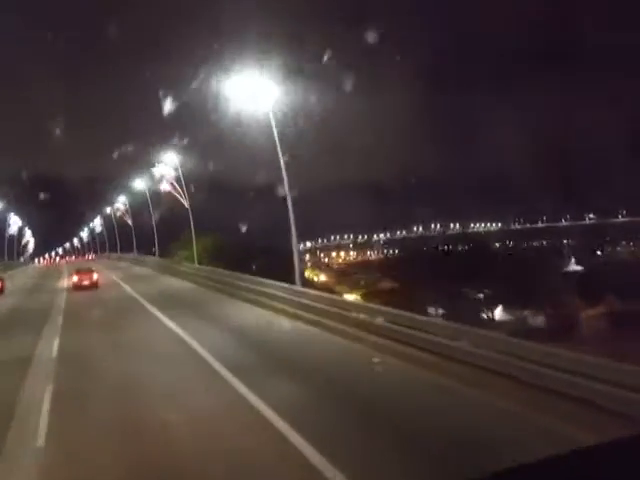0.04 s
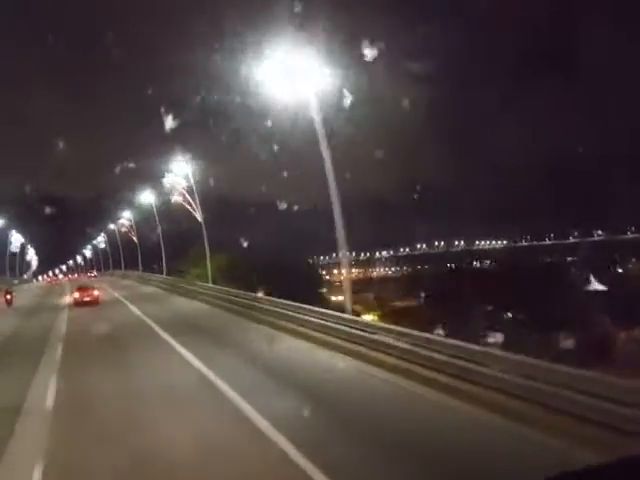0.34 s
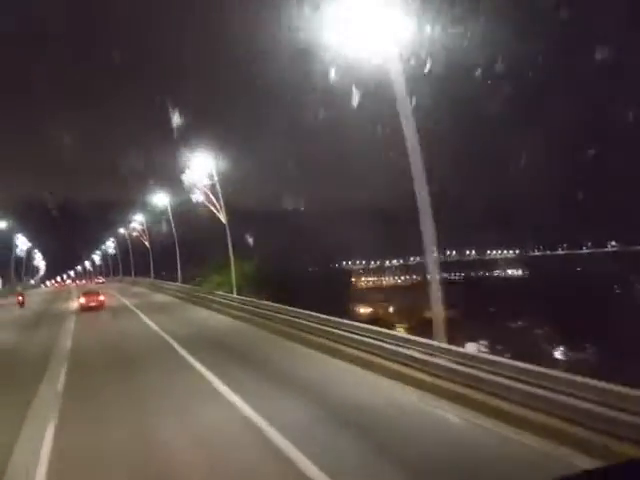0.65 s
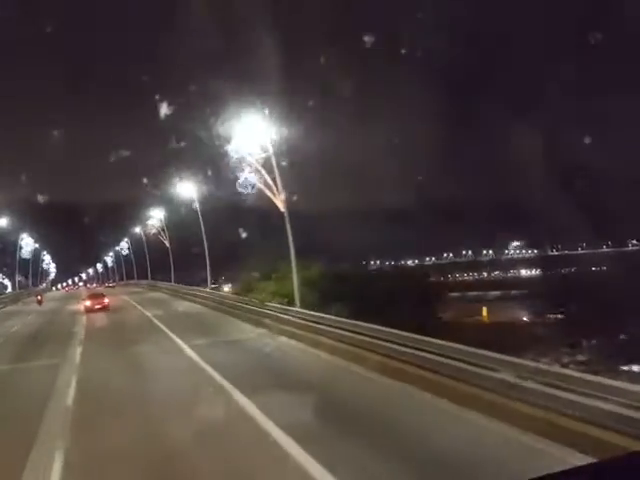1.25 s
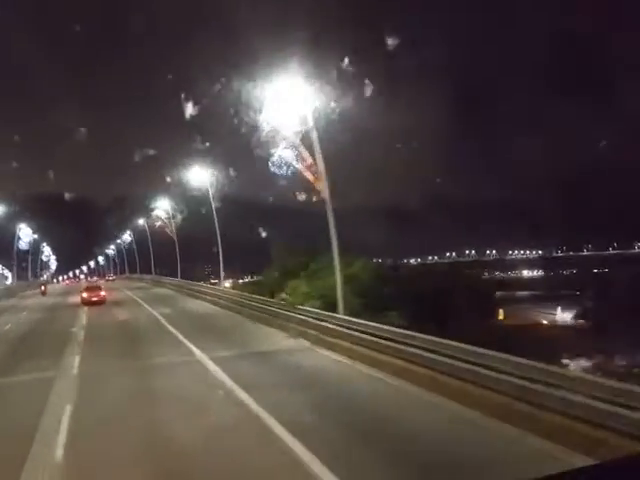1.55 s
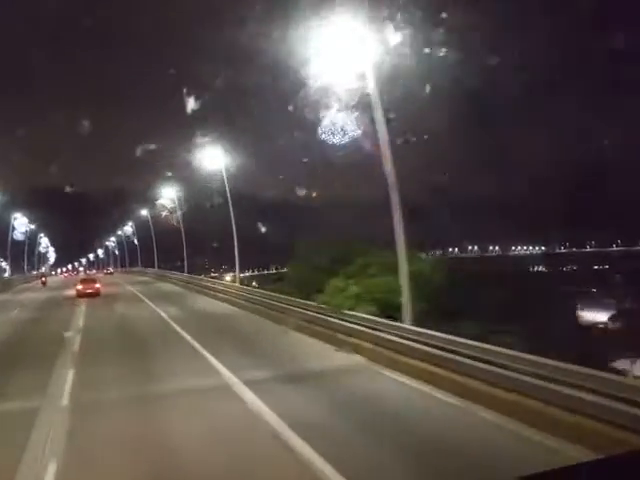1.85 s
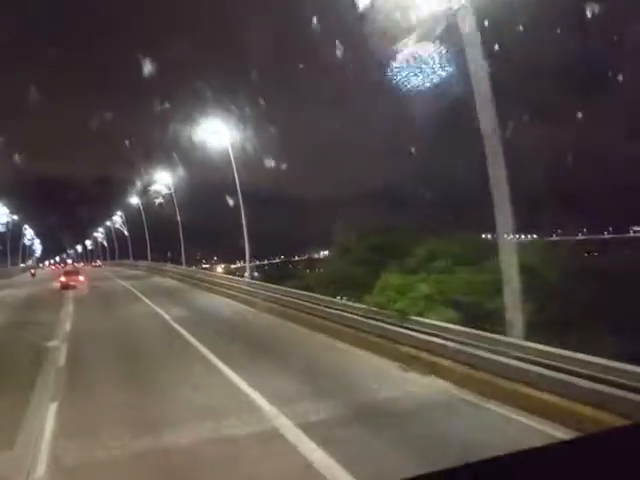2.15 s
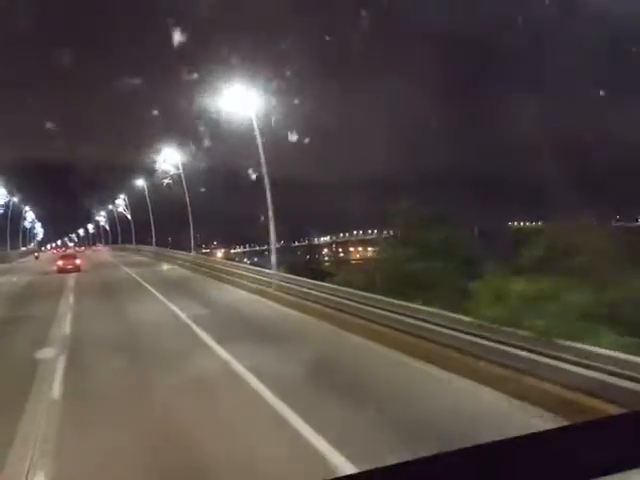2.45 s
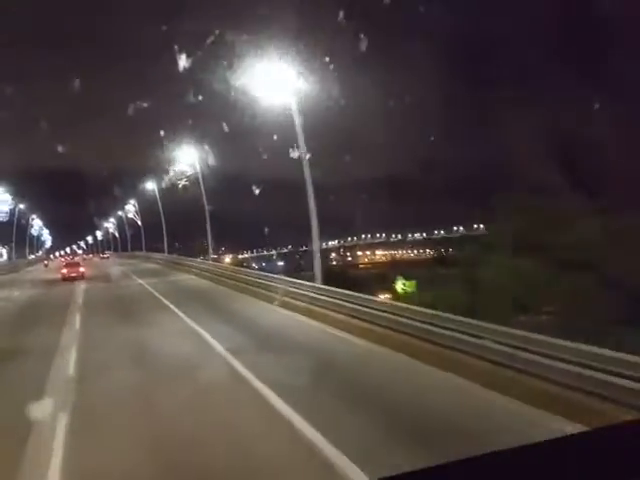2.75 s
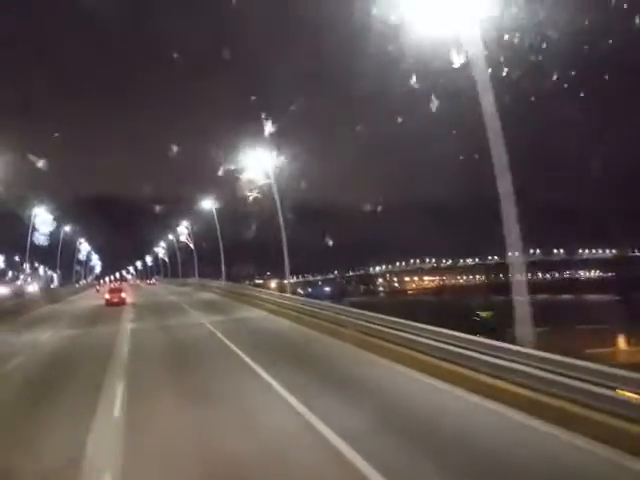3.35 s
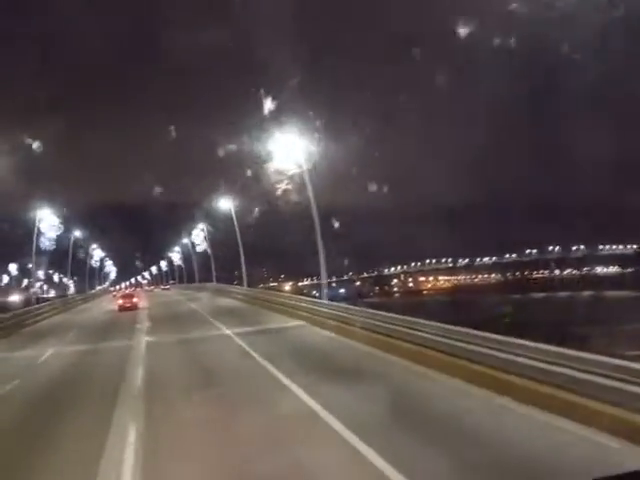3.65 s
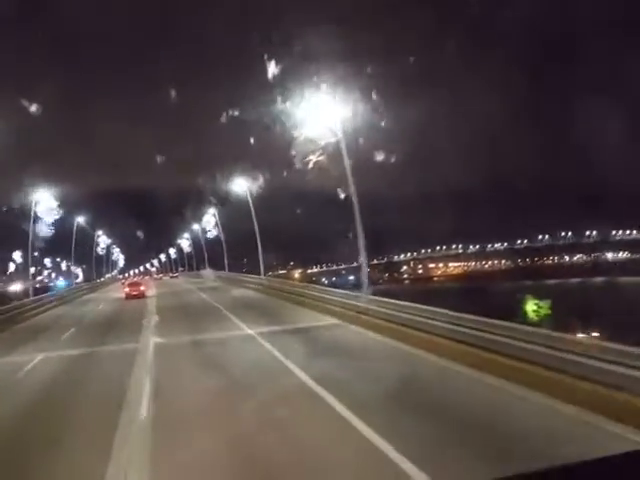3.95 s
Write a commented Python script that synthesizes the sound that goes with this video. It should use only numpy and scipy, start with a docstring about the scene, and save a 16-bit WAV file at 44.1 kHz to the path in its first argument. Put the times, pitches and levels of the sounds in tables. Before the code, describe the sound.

A bus's deep, throbbing road rumble runs for all four seconds, heard inside with tyre roar, soft wind and thin hiss. A nearby plastic panel rattles in quick bursts through the first second, with a hollow bump at 0.6 seconds. Sparser clicks and faint trim creaks follow until about 3 seconds. Then small metallic ticks and plastic rattles return, with another soft thud near 3.6 seconds.

```python
"""Inside a bus on a highway at night, from a stereo pair of microphones at the front seat.
The road shakes the body into a deep boom and throb under tyre roar, wind on the windscreen, a thin
hiss and a faint driveline whine. Bumps thud through the body. Nearby in the cabin the trim creaks,
a small metal fitting ticks and a loose plastic panel chatters in bursts of tiny contacts."""
import sys
import numpy as np
from scipy import signal
from scipy.fft import rfft, irfft
from scipy.io import wavfile
from scipy.ndimage import uniform_filter1d

SR = 44100
rng = np.random.default_rng(int(sys.argv[2]) if len(sys.argv) > 2 else 0)


def unload_wav(signal):
    """Save mono or channel-first audio to the path in sys.argv[1] as 16-bit WAV at rate SR, clipped to [-1, 1]."""
    wavfile.write(
        sys.argv[1],
        SR,
        np.round(np.clip(np.atleast_2d(signal).T, -1, 1) * 32767).astype(np.int16),
    )


N = 176400
TIME = np.arange(N) / SR
HZ = np.fft.rfftfreq(N, 1 / SR)


def amp(db):
    """Decibels to gain."""
    return 10 ** (np.asarray(db) / 20)


def unit(x):
    """Scales to rms 1."""
    return x / np.sqrt(np.mean(x ** 2) + 1e-20)


def by_pitch(points, hz):
    """Reads a table on a log-frequency axis."""
    f, value = np.transpose(points)
    return np.interp(np.log(hz + 1), np.log(f + 1), value)


def by_time(points):
    """Reads a control curve at every sample."""
    return np.interp(TIME, *np.transpose(points))


def add(mix, s, sound):
    """Mixes a stereo sound in at time s."""
    part = mix[:, max(round(s * SR), 0):][:, :sound.shape[1]]
    part += sound[:, :part.shape[1]]


def pan(db):
    """Microphone gains for a left minus right level."""
    return amp(np.array([[.5], [-.5]]) * db)


def flutter(rate_hz):
    """Random movement of rms 1, mostly slower than rate_hz."""
    return unit(irfft(rfft(rng.standard_normal(N)) * np.exp(-(HZ / rate_hz) ** 2), N))


def ring(t, hz, t60):
    """One dying mode, reaching each microphone in its own phase."""
    return np.sin(2 * np.pi * (hz * t + rng.random((2, 1)))) * np.exp(-np.log(1000) * t / t60)


def resonate(x, spectrum, tilt_db=0, uneven_db=3, uneven_hz=500, size=2048):
    """Rings x through a body of unit energy; each point of contact favours other resonances."""
    hz = abs(np.fft.fftfreq(size, 1 / SR))
    uneven = np.interp(hz / uneven_hz, np.arange(size), rng.standard_normal(size))
    tilt = tilt_db * np.log2(np.maximum(hz, 1000) / 1000)
    log_gain = np.log(amp(by_pitch(spectrum, hz) + tilt + uneven_db * uneven))
    minimum_phase = np.exp(np.conj(signal.hilbert(log_gain)))
    body = np.fft.ifft(minimum_phase).real[:size // 2]
    return signal.fftconvolve(x, body[None] / np.linalg.norm(body), axes=1)


# Likeness of the two microphones. Each row: frequency in Hz, correlation.
COHERENCE = [(60,.993),(290,.82),(640,.66),(1400,.08)]
# Balance of the pair. Each row: frequency in Hz, left minus right in dB.
BALANCE = [(130, 1), (280, -.3), (8000, -1.5)]

def noise(gain):
    """Noise of the given spectrum all around the microphones, near mono in the bass."""
    left, other = rfft(rng.standard_normal((2, N)))
    same = np.clip(by_pitch(COHERENCE, HZ), -1, 1)
    right = same * left + np.sqrt(1 - same ** 2) * other
    return unit(irfft(np.array([left, right]) * gain * pan(by_pitch(BALANCE, HZ)), N))


# The cabin's reverberation. Each row: frequency in Hz, t60 in seconds.
CABIN_DECAY = [(300, 0.16), (2000, 0.3), (15000, 0.076)]

def cabin(x, wet_db):
    """Adds the short, dense reflections of seats and windows."""
    hz, t, spectra = signal.stft(rng.standard_normal((2, SR // 3)), SR, nperseg=256)
    decay = amp(-60 * t / by_pitch(CABIN_DECAY, hz)[:, None])
    tail = signal.istft(spectra * decay, SR)[1]
    tail[:, :SR // 400] = 0  # the first reflection takes 2.5 ms
    return x + amp(wet_db) * signal.fftconvolve(x, tail / np.linalg.norm(tail[0]), axes=1)[:, :N]


# Gear tones, far in the background. Each row: pitch in Hz, level in dB, half-width in Hz.
GEAR_TONES = [(393.5, -51, 3), (763, -53.5, 10)]

def driveline():
    """The gears whine faintly in narrow, wavering bands."""
    return sum(amp(db) * noise(1 / (1 + ((HZ - hz) / width) ** 2)) for hz, db, width in GEAR_TONES)


# Hiss, wide across the pair. Each row: time in seconds, relative level in dB.
HISS_LEVEL = [(0,-46),(.4,-70),(.75,-49),(1.28,-56.5),(1.38,-66),(1.54,-52),(1.72,-51.5),(2.1,-67),(2.66,-59),(2.88,-54),(3.1,-55),(3.3,-71),(3.8,-59)]
# Its colour. Each row: frequency in Hz, gain in dB.
HISS_SPECTRUM = [(800, -8.5), (2500, 10.5), (4500, 1.5), (9300, 0.5), (11000, -7), (16000, -10)]

def hiss(gain_db=0.5):
    """A thin hiss that comes and goes."""
    level_db = gain_db + by_time(HISS_LEVEL) + 0.7 * flutter(rate_hz=60)
    return noise(amp(by_pitch(HISS_SPECTRUM, HZ))) * amp(level_db)


# Wind, heard from behind the glass. Each row: time in seconds, relative level in dB.
WIND_LEVEL = [(0,-47),(1.6,-52.5),(2,-51.5),(3.3,-53.5),(3.63,-47.5)]
# Its colour. Each row: frequency in Hz, gain in dB.
WIND_SPECTRUM = [(200, -15), (600, 5.5), (1600, 0), (3200, -9.5), (6000, -21.5), (16000, -46.5)]

def wind(gain_db=3.5):
    """Air rushes unevenly over the windscreen."""
    level_db = gain_db + by_time(WIND_LEVEL) + 1.9 * flutter(rate_hz=31)
    return noise(amp(by_pitch(WIND_SPECTRUM, HZ))) * amp(level_db)


# Roughness of the road. Each row: time in seconds, relative level of the roar in dB.
ROUGHNESS = [(0.03, -32.5), (0.52, -25.5), (0.7, -31), (1.4, -34), (3.21, -35), (3.56, -32)]
# The tyres, heard through the floor. Each row: frequency in Hz, gain in dB.
ROAR_SPECTRUM = [(60, -39), (150, 1), (220, 0.5), (272, -2), (295, -13), (370, -9.5), (540, -10),
                 (600, -16.5), (1100, -25), (2000, -55.5)]

def tyre_roar(gain_db=1.5):
    """The rolling tyres roar louder on rougher road."""
    level_db = gain_db + by_time(ROUGHNESS) + flutter(rate_hz=9.7)
    return noise(amp(by_pitch(ROAR_SPECTRUM, HZ))) * amp(level_db)


# Body shake, all around the seat. Each row: time in seconds, relative level in dB.
SHAKE_LEVEL = [(.03,-18.5),(.48,-15),(1.1,-19.5),(1.58,-25),(1.65,-16.5),(1.7,-22),(2.45,-18),(2.63,-19),(2.67,-34),(2.73,-18.5),(3.09,-24),(3.18,-14.5),(3.22,-25),(3.69,-19.5)]
# Resonances of the body and cabin air. Each row: frequency in Hz, gain in dB.
BOOM_SPECTRUM = [(12, -17.5), (32, -5), (42, -11.5), (52, -18), (62, -3), (82, -5.5), (100, -2), (114, -11),
                 (125, -6), (175, -36.5), (300, -88.5)]

def boom(gain_db=0.5, split_hz=80, upper_dip_db=0.75, smooth_s=0.2):
    """The road shakes the body's low resonances; the upper ones ease a little on rough road."""
    shape = amp(by_pitch(BOOM_SPECTRUM, HZ))
    upper_share = 1 / (1 + (split_hz / (HZ + 1)) ** 10)
    rough = by_time(ROUGHNESS)
    lower = noise(shape * np.sqrt(1 - upper_share))
    upper = noise(shape * np.sqrt(upper_share)) * amp(-upper_dip_db * unit(rough - rough.mean()))
    rumble = lower + upper
    # Even out chance swells so that the shake sets the level.
    power = uniform_filter1d((rumble ** 2).mean(0), int(smooth_s * SR))
    power = uniform_filter1d(power, int(smooth_s * SR / 2))
    return rumble / np.sqrt(power) * amp(gain_db + by_time(SHAKE_LEVEL))


# The body's throb, near centre. Each row: time in seconds, pitch in Hz, level in dB.
THROB_PATH = [(0,84,-31),(.56,82,-15),(1.202,88,-26.5),(1.399,71,-23.5),(2.5,73,-16.5),(2.67,71.9,-28),(2.76,72.03,-18),(3.299,70,-24),(3.7,73.75,-15)]

def throb(wander_hz=4.067, flutter_db=2):
    """The strongest body vibration: one deep tone that drifts in pitch, swells and sinks."""
    hz, db = (by_time(np.array(THROB_PATH)[:, [0, k]]) for k in (1, 2))
    turns = np.cumsum(hz + wander_hz * flutter(rate_hz=16.52)) / SR + rng.random()
    tone = unit(np.sin(2 * np.pi * turns)) * amp(db + flutter_db * flutter(rate_hz=14))
    return tone * pan(by_pitch(BALANCE, hz.mean()))


# Bumps under the wheels. Each row: start in seconds, level in dB, decay in seconds.
ROAD_BUMPS = [(.41, -58, 0.026), (0.576, -30, 0.063), (1.645, -43, 0.016), (3.595, -35.5, 0.092)]
# The thud as it reaches the seat. Each row: frequency in Hz, gain in dB.
THUD_SPECTRUM = [(200, -29), (280, 6.5), (330, 5), (400, 4), (600, -6), (950, -5.5), (2500, -45)]

def bumps(rise_s=0.0079):
    """The wheels hit uneven road and the body answers with a hollow thud."""
    envelope = np.zeros(N)
    for s, db, decay in ROAD_BUMPS:
        rise = np.clip((TIME - s) / rise_s, 0, 1)
        envelope += amp(db) * rise * np.exp(-abs(TIME - s) / decay)
    return envelope * noise(amp(by_pitch(THUD_SPECTRUM, HZ)))


# Trim close to the microphones. Each row: start in seconds, level in dB.
TRIM_CREAKS = [(1.527,-43),(1.869,-47.5),(2.048,-51),(2.472,-49),(2.529,-48.5),(2.697,-48.5),(2.919,-44)]

def trim(fall_s=0.0062):
    """The trim slips with tiny dry creaks, like the plastic panel but brighter."""
    out, t = np.zeros((2, N)), np.arange(SR // 20) / SR
    for s, db in TRIM_CREAKS:
        slip = rng.standard_normal((2, len(t))) * np.exp(-t / fall_s)
        add(out, s, amp(db) * resonate(slip, PANEL_SPECTRUM, tilt_db=3))
    return out


# The fitting, a little way off to the right. Each row: start in seconds, level in dB.
FITTING_TICKS = [(.180, -38), (0.263, -36.5), (1.141, -43), (1.218, -38), (1.65, -36), (2.941, -52),
                 (3.138, -36.5), (3.220, -39), (3.599, -35), (3.688, -36.5), (3.779, -40.5), (3.875, -43)]
# Its colour. Each row: frequency in Hz, gain in dB.
FITTING_SPECTRUM = [(300, -14), (1500, 1), (4500, -5), (7000, -7.5), (12000, -9), (14000, -13), (16000, -9)]
# Its modes. Each row: pitch in Hz, t60 in seconds, level against the tick in dB.
JINGLE_MODES = [(9050, .05, -10.5), (9262, .11, -18.5)]

def fitting(rise_s=0.0013, fall_s=0.0074):
    """A small metal fitting strikes in sharp ticks, each leaving a high jingle."""
    out, t = np.zeros((2, N)), np.arange(SR // 6) / SR
    for s, db in FITTING_TICKS:
        strike = rng.standard_normal((2, len(t))) * np.minimum(t / rise_s, 1) * np.exp(-t / fall_s)
        add(out, s, amp(db) * resonate(strike, FITTING_SPECTRUM))
        add(out, s, sum(amp(db + mode_db) * ring(t, hz, t60) for hz, t60, mode_db in JINGLE_MODES))
    return cabin(out * pan(-2.5), wet_db=-3.5)


# The loose panel, nearby and just right of centre. Each row: start in seconds, level in dB, chatter
# length in seconds, treble tilt in dB per octave, pitch of the struck spot in Hz, its share in dB.
PANEL_RATTLES = [(0.052, -37.5, 0.0021, 2.5, 3070, -12), (0.125, -35, 0.0074, 0, 1570, -9.5),
                 (0.219, -31.5, 0.013, -1, 1520, -9), (0.26, -34.5, 0.011, 0, 1480, -6),
                 (0.296, -39.5, 0.0092, 4, 3170, -1.5), (0.305, -30, 0.012, -1.5, 1670, -11),
                 (0.345, -35.5, 0.02, 0.5, 1520, -13), (.405, -32, 0.015, 0, 2500, -10),
                 (0.441, -37, 0.0099, 1, 2725, -4.5), (.489, -37.5, 0.0047, -7, 2590, -8),
                 (0.495, -38.5, 0.029, 1, 4580, -13), (0.542, -33, 0.024, -1.5, 1460, -7.5),
                 (0.866, -30.5, 0.0077, -1, 2080, -17), (0.919, -33.5, 0.016, -3.5, 2970, -25),
                 (1.033, -34.5, 0.0074, -2, 1260, -0.5), (1.342, -46.5, .006, -4.5, 2490, -5),
                 (1.458, -44, 0.005, -10.5, 1550, 0), (1.515, -52, 0.014, 0, 1960, 4),
                 (1.647, -31.5, 0.0052, -2.5, 1500, -12.5), (3.048, -40, 0.011, -4, 940, -5),
                 (3.475, -44, 0.0026, -10, 3498, -12), (3.509, -33.5, 0.0072, -6, 1020, -2.5),
                 (3.594, -40, 0.0089, -3.5, 1000, 1.5), (3.649, -39.5, 0.009, -3, 7280, -15)]
# The colour of the plastic sheet. Each row: frequency in Hz, gain in dB.
PANEL_SPECTRUM = [(150, -22), (500, 3.5), (1400, 3.5), (2000, -3), (3800, -6), (5500, -12.5), (8500, -8),
                  (11000, -13), (16000, -39)]

def panel(contacts_per_s=1600, scrape=0.86, stutter_db=2.5, rise_s=0.0012, fall_s=0.0056):
    """At each jolt a stuttering burst of contacts rings the whole sheet and the spot that is hit."""
    out, t = np.zeros((2, N)), np.arange(SR // 10) / SR
    stutter = unit(amp(stutter_db * np.minimum(flutter(rate_hz=280), 1)))
    first_blow = 1 + .7 * np.exp(-t / .008)
    for s, db, length, tilt_db, spot_hz, spot_db in PANEL_RATTLES:
        contacts = rng.choice([-1., 1.], (2, len(t))) * (rng.random(len(t)) < contacts_per_s / SR)
        chatter = unit(unit(contacts) + scrape * rng.standard_normal((2, len(t))))
        envelope = np.minimum(t / rise_s, 1) * np.exp(-np.maximum(t - length, 0) / fall_s)
        drive = amp(db) * chatter * stutter[round(s * SR):][:len(t)] * envelope * first_blow
        spot = signal.fftconvolve(drive, ring(t, spot_hz, t60=0.02), axes=1)
        add(out, s, resonate(drive, PANEL_SPECTRUM, tilt_db))
        add(out, s, amp(spot_db) * spot * np.linalg.norm(drive) / np.linalg.norm(spot))
    return cabin(out * pan(-0.7), wet_db=-8.5)


def scene():
    """Everything heard from the front seat."""
    ride = boom() + throb() + tyre_roar() + wind() + hiss() + driveline() + bumps()
    return ride + panel() + fitting() + trim()


def record(dry, edge_hz=15900, fade_s=.004):
    """The recorder's band limit and a soft stop."""
    stop = np.minimum((TIME[-1] - TIME) / fade_s, 1)
    lowpass = signal.firwin(511, edge_hz, window=("kaiser", 9), fs=SR)
    return signal.oaconvolve(dry * stop, lowpass[None], "same")


dry = scene()
out = record(dry)
unload_wav(out)
```